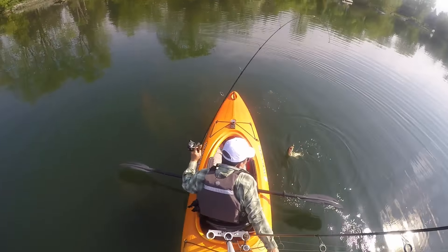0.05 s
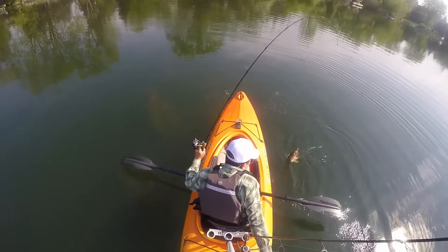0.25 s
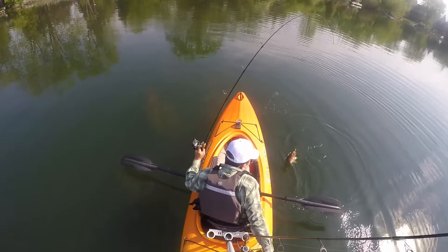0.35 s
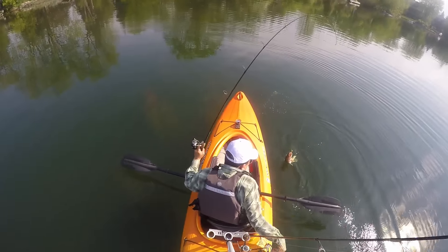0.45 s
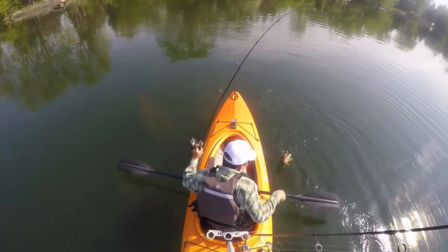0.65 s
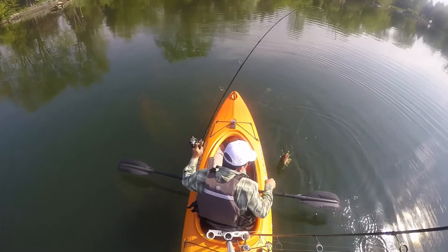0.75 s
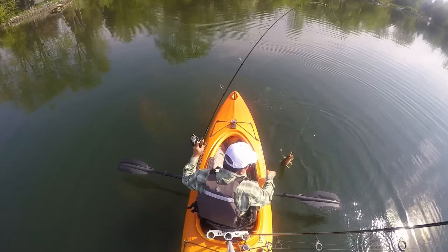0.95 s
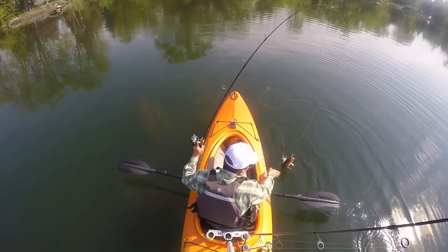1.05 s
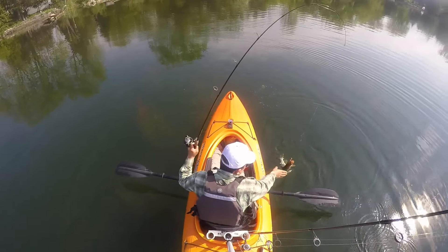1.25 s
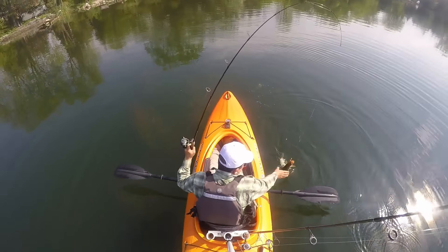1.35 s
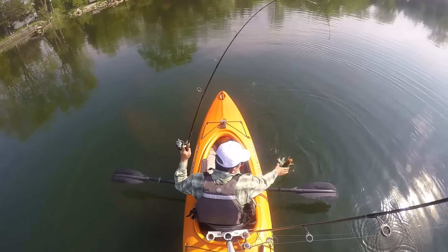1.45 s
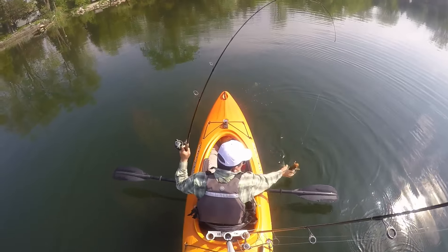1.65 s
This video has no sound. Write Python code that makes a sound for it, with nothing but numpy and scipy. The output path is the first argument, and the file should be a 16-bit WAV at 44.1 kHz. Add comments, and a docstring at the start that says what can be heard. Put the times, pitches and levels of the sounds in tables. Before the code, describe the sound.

A sharp, boomy knock on a kayak hull is followed by a lesser knock and later a muffled bump; between them the hull rumbles quietly and gear brushes lightly on a calm open lake, miked on the boat.

```python
"""A calm lake: gear knocks three times, with fainter touches between, on a plastic kayak bearing a pole camera.
Each knock excites decaying modes of shell and pole, dense clatter noise and a deep boom, a low damped sine.
Between them the hull rumbles (a wandering low tone and coloured noise) while gear rubs and ticks lightly.
Far off are a thin steady insect-like tone, made of narrow-band noise, and faint bird whistles, gliding sines."""
import sys
import numpy as np
from scipy import signal
from scipy.fft import rfft, irfft, next_fast_len
from scipy.io import wavfile
from scipy.ndimage import uniform_filter1d, minimum_filter1d, map_coordinates

SR = 44100
rng = np.random.default_rng(int(sys.argv[2]) if len(sys.argv) > 2 else 0)


def unload_audio(sound):
    """Save the sound as a 16-bit wav file, at the path given as the first command line argument."""
    columns = np.transpose(np.atleast_2d(sound))
    # keep every value between -1 and 1, then stretch to whole-number steps
    steps = np.round(np.clip(columns, -1, 1) * 32767)
    wavfile.write(sys.argv[1], SR, steps.astype(np.int16))


N = 74970

CONTACT_ATTACK_S = 0.00054  # time constant of the onset of clatter and cracks


def amp(db):
    """Level law: decibels to amplitude ratio."""
    return 10 ** (np.asarray(db) / 20)


def unit(x):
    """Power normalisation: scale to rms 1."""
    return x / np.sqrt(np.mean(x ** 2) + 1e-20)


def along(points, hz):
    """Logarithmic frequency scale: interpolate (frequency, value) points along it."""
    f, v = np.transpose(points)
    return np.interp(np.log(hz + 1), np.log(f + 1), v)


def level(rows):
    """Amplitude envelope: (time_s, level_db) points, straight in decibels, as one gain per sample."""
    return amp(np.interp(np.arange(N) / SR, *np.transpose(rows)))


def wobble(rate):
    """Slow random modulation: a smooth curve through `rate` random knots a second."""
    knots = rng.standard_normal(N // 50)
    return map_coordinates(knots, [np.arange(N) * rate / SR], mode="wrap")


def filtered(x, response):
    """Linear filtering: multiply the spectrum of x by a response of frequency."""
    m = next_fast_len(len(x) + 8192)  # zero padding against wrap-around
    hz = np.fft.rfftfreq(m, 1 / SR)
    return irfft(rfft(x, m) * response(hz), m)[:len(x)]


def noise(colour, size):
    """Spectral shaping: white noise given a colour and scaled to rms 1."""
    white = rng.standard_normal(size)
    return unit(filtered(white, lambda hz: amp(along(colour, hz))))


def fade(t, t60):
    """Exponential damping: a fall of 60 dB in t60 seconds."""
    return np.exp(-np.log(1000) * t / t60)


def onset(t, attack):
    """Exponential build-up with time constant `attack` seconds."""
    return 1 - np.exp(-t / attack)


def ring(t, hz, t60, attack):
    """Damped free vibration: one struck mode."""
    return np.sin(2 * np.pi * hz * t) * fade(t, t60) * onset(t, attack)


def glide(hz):
    """Frequency modulation: a sine whose phase sums its changing frequency."""
    return np.sin(2 * np.pi * np.cumsum(hz) / SR)


def add(out, s, x):
    """Superposition: mix x into out from time s, in place."""
    part = out[max(round(s * SR), 0):][:len(x)]
    part += x[:len(part)]


def rumble():
    """Forced low resonance: the paddler's movements keep hull swinging and shell shuddering, over broad rumble."""
    # Swing of the low resonance: time_s, level_db
    swing_level = [(0, -28), (.19, -28), (.23, -31), (.49, -19.5), (.535, -36), (.57, -21), (.63, -20.5),
                   (.74, -32), (.8, -31), (.96, -30.5), (1.026, -53), (1.074, -30.5), (1.19, -37.5),
                   (1.3, -28), (1.38, -52), (1.52, -24.5), (1.6, -39.5), (1.7, -41)]
    # Hollow shudder of the shell: time_s, level_db
    shudder_level = [(0, -31.5), (.08, -56), (.14, -32.5), (.22, -51.5), (.3, -25.5), (.38, -42),
                     (.43, -19.5), (.49, -27), (.54, -40), (.62, -47.5), (.82, -66), (.9, -40.5),
                     (1.0, -57), (1.12, -46), (1.2, -38.5), (1.27, -53), (1.45, -39.5), (1.55, -80.5),
                     (1.7, -64)]
    # Relative spectrum of the shudder: frequency_hz, level_db
    shudder_colour = [(70, -25.5), (105, 11), (140, -1.5), (190, -10), (260, -18), (360, -25), (460, -31.5),
                      (900, -81)]
    # Relative spectrum of the broad rumble: frequency_hz, level_db
    broad_colour = [(15, -15.5), (27, 22.5), (40, -19), (60, -10.5), (80, 7.5), (110, 3.5), (160, -21.5),
                    (300, -50)]
    swing_hz = 63.3 + 3.72 * wobble(22)
    swing = unit(glide(swing_hz) * amp(0.58 * wobble(25)))
    shudder = noise(shudder_colour, N)
    broad = amp(-35) * noise(broad_colour, N)
    return level(swing_level) * swing + level(shudder_level) * shudder + broad


def slip_ticks():
    """Stick-slip: tiny slips at random instants, each exciting the same short burst of coloured noise."""
    # Relative spectrum of one tick: frequency_hz, level_db
    tick_colour = [(300, -15), (700, 2.5), (1150, -1), (1600, -8), (2600, -12.5), (4000, -23.5),
                   (9000, -39)]
    ticks_per_s, spread_db, t60_s = 120, 1.5, .02
    chance, size = rng.random(N), rng.standard_normal(N)
    slips = (chance < ticks_per_s / SR) * amp(spread_db * np.clip(size, -2, 2))
    t = np.arange(SR // 10) / SR
    tick = noise(tick_colour, len(t)) * fade(t, t60_s)
    return signal.fftconvolve(slips, tick)[:N]


def rubbing():
    """Dry friction: uneven rubbing of gear and clothing, carried through the hull, with slips ticking in it."""
    # Shared envelope of rub and ticks: time_s, level_db
    rub_level = [(0, -42.5), (.03, -63), (.07, -48), (.15, -51), (.22, -56.5), (.35, -47.5), (.48, -68.5),
                 (.58, -60.5), (.75, -55.5), (.9, -58), (.97, -68.5), (1.06, -55.5), (1.23, -52),
                 (1.36, -55.5), (1.48, -51.5), (1.58, -56), (1.7, -54.5)]
    # Relative spectrum of the rub: frequency_hz, level_db
    rub_colour = [(100, -5), (200, -4), (280, 1.5), (370, -3.5), (460, -13.5), (600, 1), (730, -2),
                  (850, -11.5), (1100, -1.5), (1400, -21.5), (2000, -21), (4000, -36), (10000, -41)]
    rub = unit(noise(rub_colour, N) * amp(0.82 * wobble(97)))
    return level(rub_level) * (rub + amp(-3) * slip_ticks())


def still_air():
    """Stationary random noise: the steady hiss of still air."""
    # Relative spectrum of the air: frequency_hz, level_db
    air_colour = [(880, -36.5), (1500, 14), (2040, 3), (2630, 13.5), (3990, 10.5), (4880, 4.5), (5650, 13),
                  (14200, -73.5), (15200, -38.5)]
    return amp(-71) * noise(air_colour, N)


def insect():
    """Narrow-band noise: a resonance curve selects a thin, steady tone."""
    centre_hz, half_width_hz = 4765, 120  # half width at half amplitude
    white = rng.standard_normal(N)
    return amp(-76.5) * unit(filtered(white, lambda hz: 1 / (1 + ((hz - centre_hz) / half_width_hz) ** 2)))


def knock_clatter(size):
    """High modal density: close modes of the shell as noise whose treble dies first, with a weak longer tail."""
    # Relative spectrum at the blow: frequency_hz, level_db
    clatter_colour = [(100, 5.5), (250, -3), (370, 0.5), (430, -21), (500, -22), (590, 2), (1100, 0.5),
                      (1500, -10), (2600, -19.5), (3400, -16), (4200, -26), (7000, -35.5), (11000, -42.5),
                      (15000, -58)]
    # Damping of the main decay: frequency_hz, t60_s
    clatter_t60 = [(200, 0.17), (600, 0.065), (1200, 0.05), (3000, 0.047), (8000, .04)]
    tail_db, tail_times = -18, 3  # level and duration relative to the main decay
    hz, t, spectrum = signal.stft(noise(clatter_colour, size), SR, nperseg=128)
    t60 = along(clatter_t60, hz)[:, None]
    decay = fade(t, t60) + amp(tail_db) * fade(t, t60 * tail_times)
    return signal.istft(spectrum * decay, SR, nperseg=128)[1][:size]


def shell_ring(t, place):
    """Modal superposition: the place struck sets how strongly each mode of the shell is excited."""
    # Modes of the shell, levels relative: frequency_hz, t60_s, side_db, deck_db, rim_db
    shell_modes = [(104, 0.043, -13.5, -22.5, -17), (129.8, 0.15, -5, -19, -26),
                   (253.6, .10, -22.5, -8, -17), (320, .10, -10, -17, -11.5),
                   (361.6, 0.15, -29, -7.5, -15.5), (572, 0.077, -24, -14, -10.5),
                   (652, .05, -31, -2, -17.5), (722, 0.064, -11.5, -5, -7),
                   (795.7, 0.1, -13.5, -27.5, -17.5), (922, 0.059, -24.5, -7.5, -27),
                   (1056, 0.041, -1.5, -9.5, -40), (1273, 0.043, -9.5, -13, -6.5),
                   (1379, 0.043, -17, -28.5, -26.5), (1594, 0.057, -15.5, -34.5, -19.5),
                   (1767, 0.059, -25.5, -18.5, -37.5), (2050, 0.023, -42, -32.5, -45.5),
                   (2355, 0.042, -25, -40.5, -46.5), (2480, .08, -27, -40, -45),
                   (3010, 0.031, -44, -35, -30.5)]
    # Places struck, in the order of those level columns: place
    places = ["side", "deck", "rim"]
    column = places.index(place)
    modes = sum(amp(gains[column]) * ring(t, hz, t60, 0.0012) for hz, t60, *gains in shell_modes)
    return amp(-0.5) * modes


def pole_ring(t):
    """Modal superposition: the camera pole's weak, longer ring after any blow."""
    # Modes of the pole, levels relative: frequency_hz, level_db, t60_s
    pole_modes = [(362, -36, .3), (587, -37, .45), (815, -42, .3), (915, -35, .45), (1025, -36, .25),
                  (1085, -36, .3), (1574, -42, .28), (2207, -48, .25), (2478, -48, .18)]
    return amp(-1.5) * sum(amp(db) * ring(t, hz, t60, 0.029) for hz, db, t60 in pole_modes)


def knocks():
    """Impact excitation: each contact rings shell and pole, with clatter low-passed at that contact's corner."""
    # Contacts of gear with the boat, levels relative: start_s, place, ring_db, clatter_db, clatter_corner_hz
    contacts = [(.0625, "side", -41, -43, 3000), (.091, "rim", -35, -37.5, 1204),
                (.0965, "side", -31, -33, 4000), (0.14, "side", -35, -62, 1800),
                (.174, "side", -47, -44.5, 3500), (.2415, "rim", -8.5, -14.5, 6000),
                (.2455, "side", 2.5, -8, 3540), (0.2522, "deck", -7, -14, 2410),
                (0.345, "side", -43, -37.5, 3450), (.4003, "deck", -11.5, -16, 2037),
                (.4045, "deck", -12, -16.5, 1156), (.460, "deck", -38, -51, 2460),
                (1.201, "rim", -40, -54, 1544), (1.236, "side", -43, -43, 2200),
                (1.4085, "rim", -19.5, -27, 1270)]
    out, t = np.zeros(N), np.arange(SR // 2) / SR
    pole = pole_ring(t)
    for s, place, ring_db, clatter_db, corner_hz in contacts:
        lowpass = signal.butter(2, min(corner_hz, SR * .45), fs=SR)
        clatter = signal.lfilter(*lowpass, knock_clatter(len(t)) * onset(t, CONTACT_ATTACK_S))
        add(out, s, amp(ring_db) * (shell_ring(t, place) + pole) + amp(clatter_db) * clatter)
    return out


def cracks():
    """Impulsive broadband excitation: hard edges snap as very short bursts of coloured noise."""
    # Snaps, levels relative: start_s, level_db
    snaps = [(0.2439, -27), (0.2442, -30.5), (0.2543, -22.5), (0.397, -41.5)]
    # Relative spectrum of a snap: frequency_hz, level_db
    crack_colour = [(1000, -2.5), (3000, 3.5), (5000, -6.5), (8000, -16), (11300, -23.5), (12500, -46)]
    out, t = np.zeros(N), np.arange(SR // 2) / SR
    for s, db in snaps:
        burst = noise(crack_colour, len(t)) * fade(t, .012)
        add(out, s, amp(db) * burst * onset(t, CONTACT_ATTACK_S))
    return out


def booms():
    """Damped oscillator: hull and pole give way under a blow and swing back at their low resonance."""
    # Booms, levels relative: start_s, level_db, pitch_hz, t60_s
    swings = [(0.2454, 3.5, 70.1, .22), (0.317, -4.5, 61.7, 0.36), (0.405, -5, 73.3, 0.1),
              (1.417, -6, 61.2, 0.21), (1.486, -23, 58.7, 0.26)]
    out, t = np.zeros(N), np.arange(SR) / SR
    for s, db, hz, t60 in swings:
        add(out, s, -amp(db) * ring(t, hz, t60, 0.0062))  # every boom starts moving negative
    return out


def bird_whistles():
    """Gliding tones with reverberation: far whistles, their pitch wavering, smeared by the wooded shore."""
    # Whistles, levels relative: start_s, length_s, start_hz, end_hz, level_db
    whistles = [(.335, .05, 5700, 5850, -75), (0.376, 0.056, 5930, 6180, -57),
                (0.426, 0.036, 5770, 5120, -70), (1.09, 0.07, 2890, 3850, -63.5),
                (1.257, 0.032, 3500, 3430, -66), (1.343, 0.058, 5230, 5230, -65),
                (1.42, 0.089, 5200, 5780, -60.5), (1.487, 0.04, 5960, 6140, -55),
                (1.533, 0.042, 5920, 5060, -60.5), (1.538, .035, 6000, 6120, -62)]
    birds = np.zeros(N)
    for s, length, start_hz, end_hz, db in whistles:
        u = np.linspace(0, 1, round(length * SR))
        waver_hz = 70 * wobble(250)[:len(u)]
        hz = start_hz + (end_hz - start_hz) * u + waver_hz
        add(birds, s, amp(db) * np.sin(np.pi * u) * glide(hz))
    t = np.arange(SR // 2) / SR
    shore = rng.standard_normal(len(t)) * fade(t, .3)  # diffuse echo as decaying noise
    echo = signal.fftconvolve(birds, shore / np.linalg.norm(shore))[:N]
    return .7 * birds + .6 * echo


def scene():
    """Superposition: boat and lake sum at one microphone."""
    boat = rumble() + rubbing() + knocks() + cracks() + booms()
    lake = still_air() + insect() + bird_whistles()
    return (boat + lake)[None]


def record(dry):
    """Band and peak limiting: a gentle high-pass takes away the lowest bass, peaks are limited and the camera
    cuts all above its band."""
    top_hz, peak, hold_s = 15400, 1, .002
    x = signal.lfilter(*signal.butter(1, 12, "high", fs=SR), dry[0])
    hold = round(hold_s * SR)
    gain = peak / np.maximum(np.abs(x), peak)
    gain = uniform_filter1d(minimum_filter1d(gain, hold), hold)  # held, then smoothed
    return filtered(x * gain, lambda hz: hz < top_hz)[None]


dry = scene()
out = record(dry)
unload_audio(out)
```